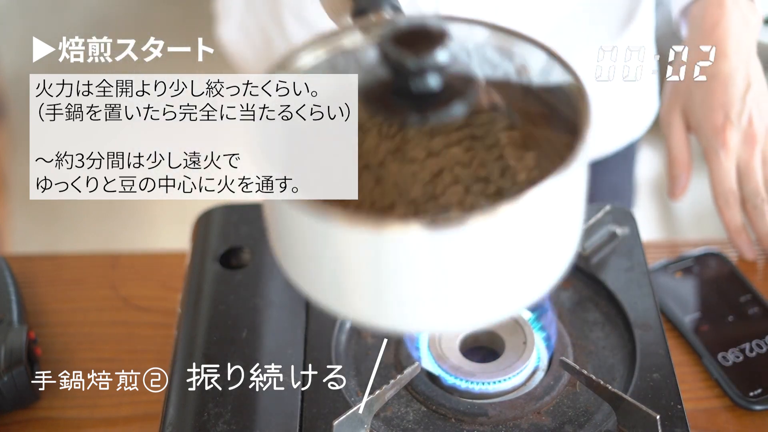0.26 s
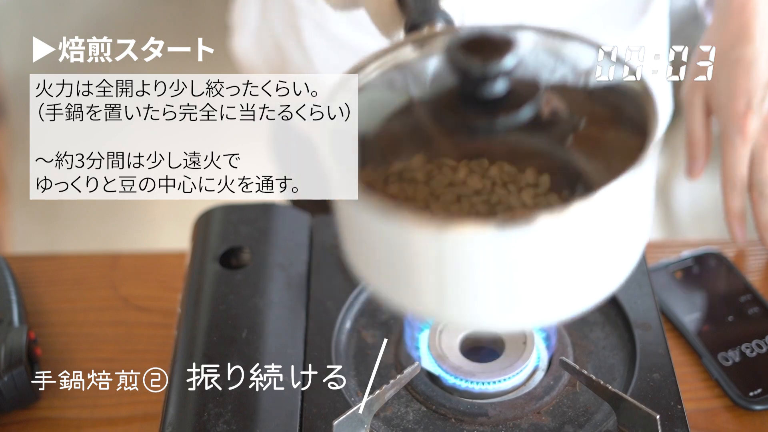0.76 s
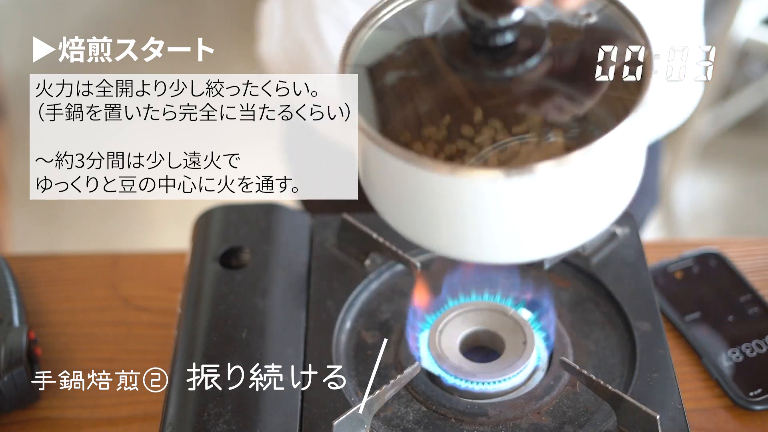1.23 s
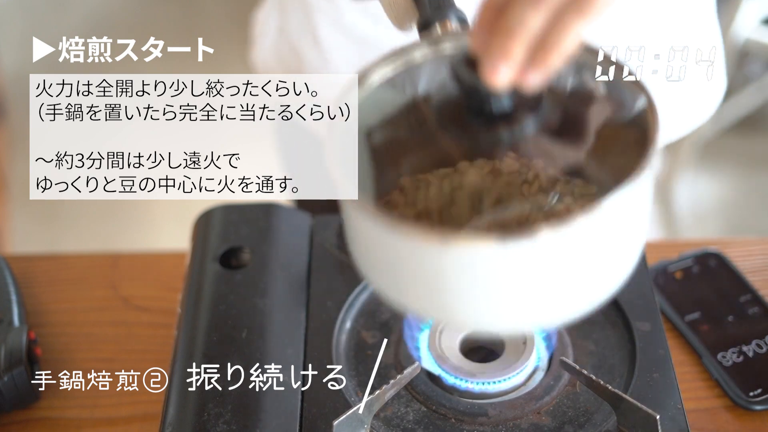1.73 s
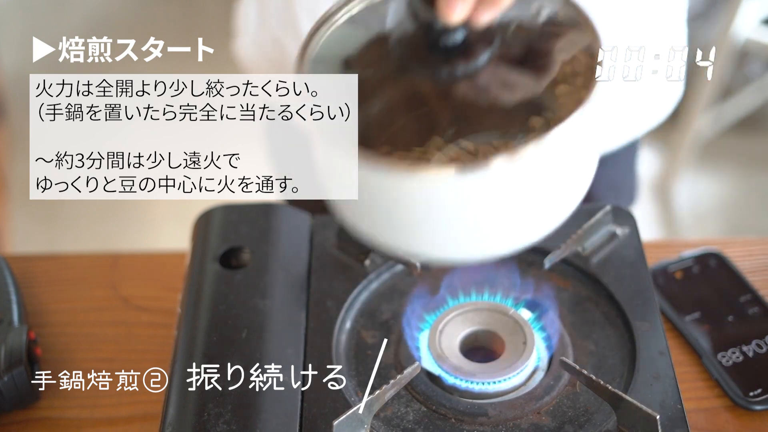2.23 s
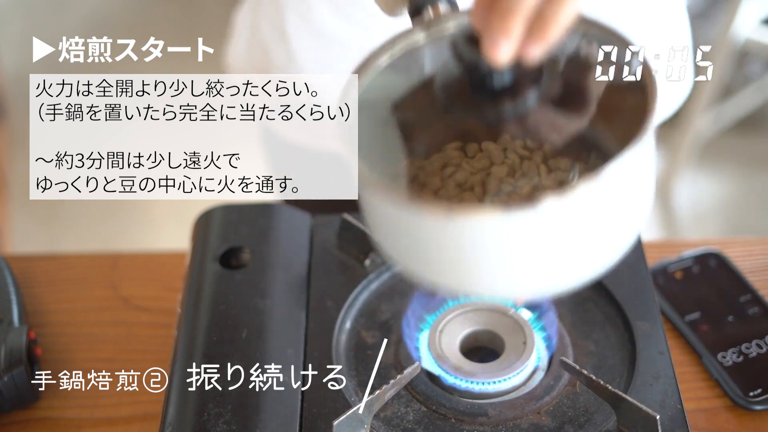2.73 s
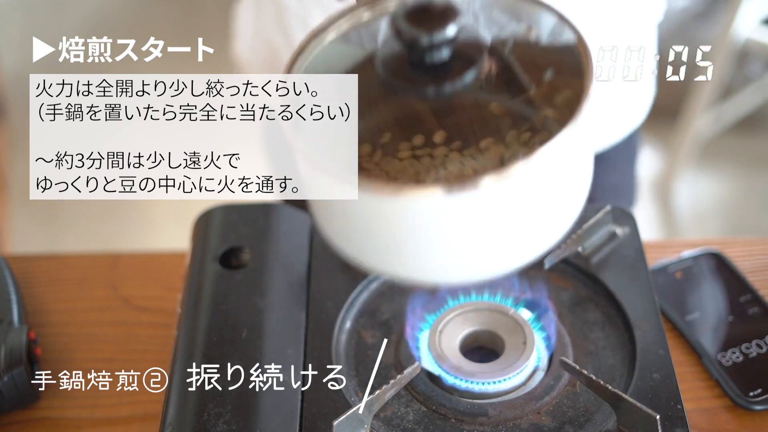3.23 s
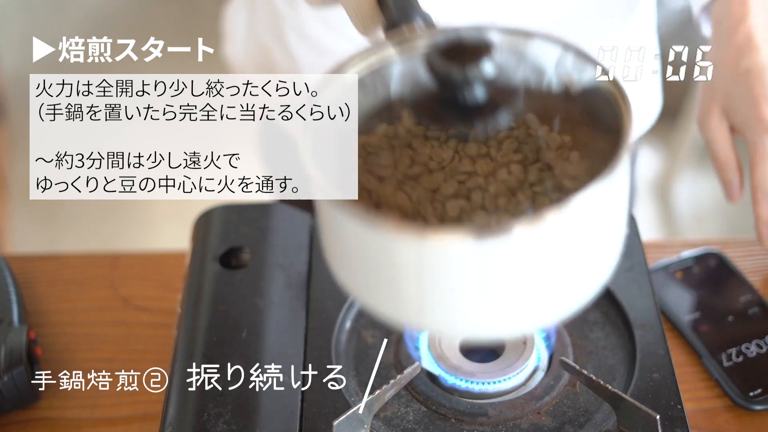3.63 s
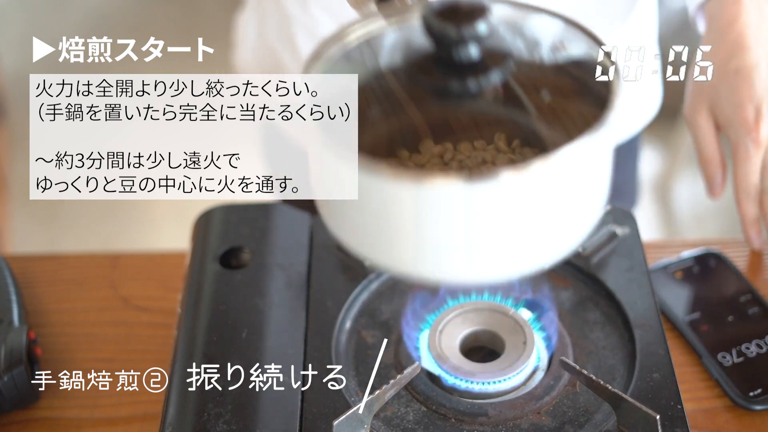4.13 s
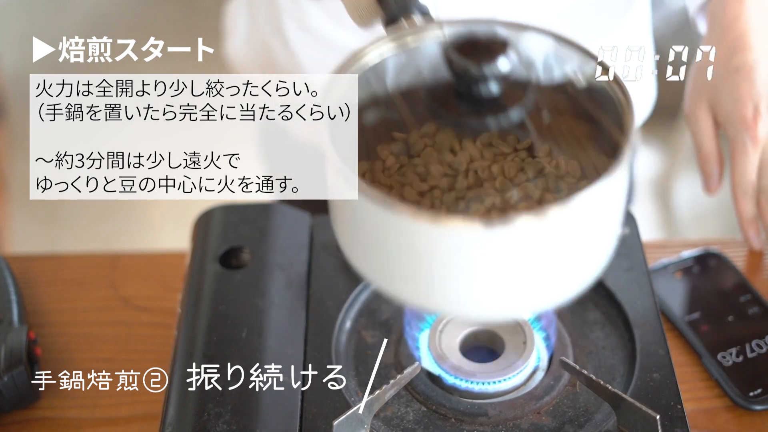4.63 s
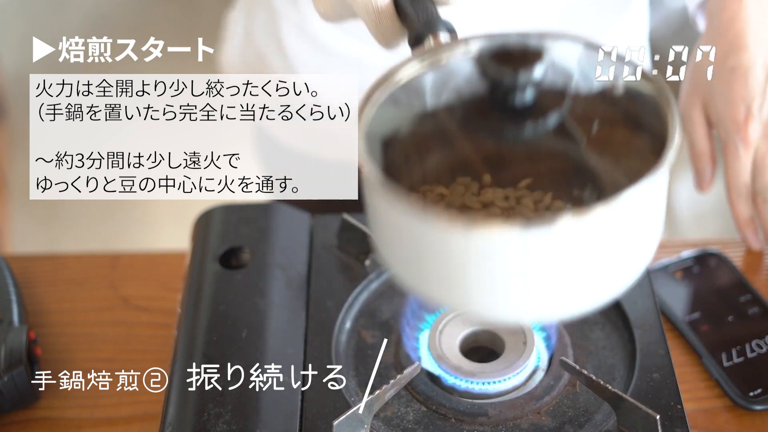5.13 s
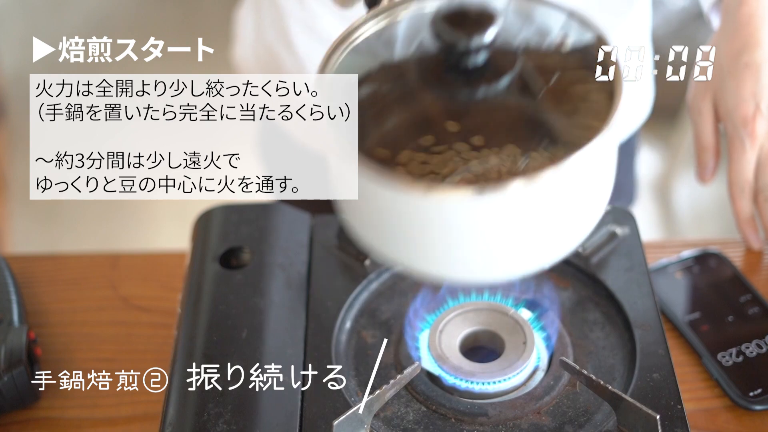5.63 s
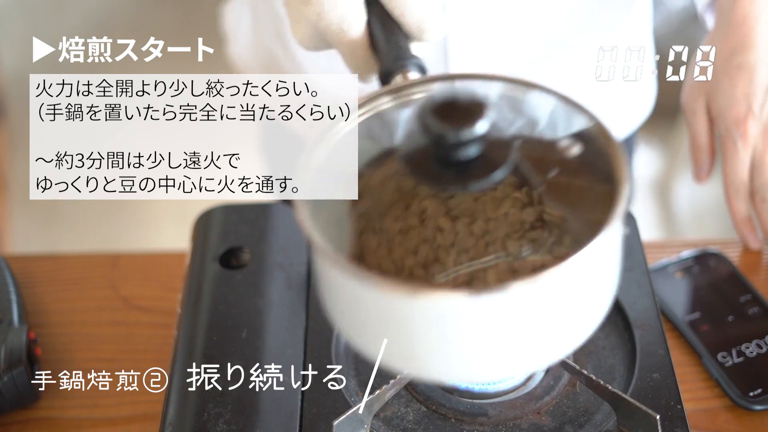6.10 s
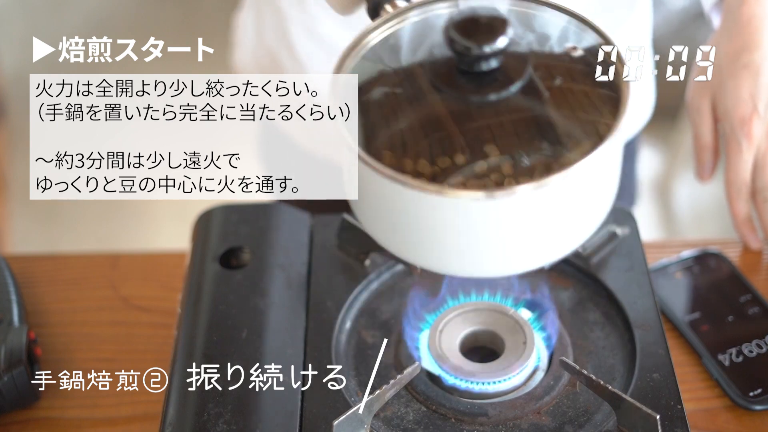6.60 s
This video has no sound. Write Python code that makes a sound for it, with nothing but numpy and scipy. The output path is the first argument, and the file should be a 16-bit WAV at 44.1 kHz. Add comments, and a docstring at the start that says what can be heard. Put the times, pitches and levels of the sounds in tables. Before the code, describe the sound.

A close microphone hears a pot of raw coffee beans shaken steadily over a gas burner. Grainy metallic rolling surges and briefly stops with each swing, joined by crisp patter on glass, strongest in the opening seconds. Sharp lid clinks and hollow knocks from the landing beans punctuate it throughout. The flame is barely audible, the bass is thin, and the small kitchen adds short, muted reflections.

```python
"""Raw beans tumble in a lidded metal pot shaken to and fro over a gas flame in a kitchen.
From the start, rolling beans tick on the metal and set it ringing, and flung beans patter on the glass lid.
The flame rushes softly as filtered noise, and the kitchen answers the pot with short, dull echoes.
Soon the loose lid starts to chatter on the rim: short bursts of touches ring pot and glass.
Then the heap begins to thud into the wall: ragged bursts of blows give a boom, a knock and a clack."""
import sys
import numpy as np
from scipy import signal
from scipy.fft import rfft, irfft, next_fast_len
from scipy.io import wavfile
from scipy.ndimage import map_coordinates

SR = 44100
rng = np.random.default_rng(int(sys.argv[2]) if len(sys.argv) > 2 else 0)


def invert_db(x):
    """Field ratio 10**(x/20) for x, a level in decibels (scalar or array-like)."""
    u = np.asarray(x, float) / 20
    return 10 ** u


def pcm_store(signal):
    """Save signal as 16-bit PCM."""
    levels = np.round(np.clip(np.atleast_2d(signal), -1, 1) * 32767)
    wavfile.write(sys.argv[1], SR, levels.astype(np.int16).T)


N = 302526  # samples, about 6.86 s

# where the beans roll, as a boost of some pot modes: t/s, low floor modes/dB, high wall modes/dB
ROLLING_PATH = [(0, 7, 2), (.4, 9.5, 8), (.8, 9, 3.5), (1.2, 5.5, 1), (1.6, 5.5, -1.5), (2.1, 8, 4.5),
                (2.6, 3, 2.5), (3.1, 8, 8.5), (3.6, 6.5, -1), (4.1, 5.5, 1.5), (4.6, 7, 1.5), (5.1, 3, 4.5),
                (5.6, 4.5, 6.5), (6.2, 4, 5), (6.86, 2.5, 1)]
# vigour of the shaking, before waves and lulls: t/s, rolling level/dB, thin spray level/dB
SHAKING_VIGOUR = [(0, -18.5, -23.5), (.45, -21.5, -27), (.85, -16, -20.5), (1.2, -15, -34),
                  (1.5, -23, -33.5), (1.85, -20.5, -29.5), (2.3, -21.5, -30.5), (2.8, -24, -31),
                  (3.3, -24, -30.5), (3.8, -17.5, -28), (4.2, -22, -37), (4.7, -25, -37.5),
                  (5.15, -21, -30.5), (5.5, -24.5, -26.5), (5.9, -22.5, -27), (6.4, -23, -31),
                  (6.86, -19, -28)]
# the heap lies still for a moment against the wall: t/s, depth/dB, half length/ms (to 1/e of the depth)
STILL_MOMENTS = [(.15, 3, 58), (.96, 5, 140), (1.308, 7, 18), (1.616, 12, 6.9), (1.948, 8, 50),
                 (2.6, 4, 36), (2.921, 12, 10), (3.252, 7, 25), (3.61, 7, 14), (3.95, 8.5, 23),
                 (4.31, 6, 24), (4.65, 5, 10), (4.959, 11, 16), (5.31, 7.5, 46), (5.66, 4.5, 30),
                 (6.69, 3, 61)]
# a wave of beans surges up to the lid: crest t/s, spray level/dB, lift of the rolling/dB, fall/ms (to 1/e)
BEAN_WAVES = [(.25, -49, 0, 72), (.86, -19, 5.5, 42), (1.03, -8.5, 4, 44), (1.181, -15.5, -8, 27),
              (1.391, -20, 2, 38), (1.85, -38, -1.5, 9), (2.01, -10.5, 5, 22), (2.16, -20, 2, 12),
              (2.329, -17.5, 5.5, 42), (2.46, -24, 0, 35), (2.645, -14.5, 7.5, 28), (2.81, -22, 5, 12),
              (2.966, -17.5, 5, 67), (3.32, -16, 5.5, 42), (3.7, -29, 0.5, 20), (3.9, -30, 0, 44),
              (4.03, -15.5, 7, 30), (4.35, -24.5, 4.5, 48), (4.53, -26.5, 0.5, 31), (4.72, -23.5, 7, 31),
              (5.37, -45, 1.5, 46), (5.86, -34, 0, 26), (6.06, -26.5, -2, 87), (6.4, -21.5, 0, 60),
              (6.74, -18, -3.5, 35)]
# modes (ringing pitches) of pot and lid: f/Hz
MODE_HZ = [590, 786, 1150, 1445, 2420, 2740, 3280, 3490, 3768, 4270, 4757, 5062, 5406, 6044, 6450, 6640,
           6795, 7120, 7550, 7950, 8755, 9520, 9995, 10450, 11060, 11900, 12250, 12915, 13300, 14080, 14480]
# how each of those modes rings: width/Hz (wider dies sooner), level/dB
MODE_RING = [(84, -12.5), (76, -2.5), (97, -16.5), (68.5, -5), (96, -13), (65, -6.5), (70, -11), (60, -7),
             (77.6, 4), (90.5, -12), (50, -6.5), (66, 1.5), (41, -8), (39.7, -8), (80, -7.5), (60, -9.5),
             (90, -3), (80, -11.5), (90, -14.5), (45, -14), (91, -10.5), (60, -15.5), (90, -9.5),
             (387, -11.5), (80, -7.5), (89, -14), (200, -14.5), (68, -8), (119, -15), (110, -19),
             (150, -12.5)]
# dry tick of one bean, its relative spectrum: f/Hz, level/dB
BEAN_TICK = [(100, -2), (250, -2.5), (400, -5.5), (800, -18), (1640, -2.5), (3090, -0.5), (4430, -10.5),
             (5800, -20.5), (7500, -18), (9200, -22), (10800, -19), (13500, -36.5), (15800, -15)]
# modes of the air and floor of the pot: f/Hz, width/Hz, level/dB
POT_HOLLOW = [(179.6, 59, -1), (254.8, 31.5, 4.5), (325, 12.3, -7.5), (475, 17, -8), (566, 280, -19)]
# band of the flame's rush, lower and upper edge: f/Hz
FLAME_BAND = [130, 700]
# the lid strikes the rim: t/s, relative peak level/dB, pitch the pot ring is centred on f/Hz,
# glass level against that peak/dB
LID_STRIKES = [(0.053, -3, 6790, 3), (0.389, -0.5, 6050, -1), (0.569, -5, 4250, -1), (0.815, 2, 4750, -4),
               (0.939, 1, 4140, -24), (0.953, 3, 4270, -20), (0.999, 5.5, 5250, -1), (1.118, -1, 3280, -22),
               (1.2595, -7, 4750, -18), (1.391, -2, 7100, 8), (1.8472, -12, 3750, 16.5),
               (1.8835, 4, 3960, -22), (1.892, 9, 4040, -13), (1.902, -1, 3860, -26), (2, -1, 7140, -7),
               (2.2096, -2, 3780, -25), (2.2272, 10.5, 4440, -23), (2.2988, 7, 4120, -9),
               (2.4654, 5, 6700, 0.5), (2.5535, 5, 3920, -30), (2.63, 0, 3770, -10),
               (2.8767, 1.5, 3770, -26), (2.9366, -2, 4000, -20), (2.956, 7.5, 6600, -4),
               (3.277, -14, 3900, 18), (3.301, -2, 3520, -12), (3.399, -6, 3490, -28), (3.457, -3, 3700, 0),
               (3.484, 1.5, 6790, 1.5), (3.569, -10, 4270, -16), (3.6446, -2, 2740, -3),
               (3.689, -8, 3760, 7), (3.745, -3, 4270, -20), (3.869, 1.5, 6770, -1), (4.0156, -5, 3760, -4),
               (4.096, -10, 5060, -4), (4.141, -12, 6790, -6), (4.187, -17, 6790, 5),
               (4.2175, 10, 7000, -8), (4.2424, -12, 3750, 7), (4.5167, 8, 7200, -1), (4.71, 3, 3770, -21),
               (4.7262, -7, 5040, 9.5), (5.2764, -0.5, 3920, -37), (5.6206, 6, 4030, -33),
               (5.9753, -3, 3880, -25), (5.9983, -1, 4040, -23), (6.042, -2, 6800, 1), (6.3, 3, 4200, -45),
               (6.312, 6, 4000, -30), (6.347, -3, 4270, -6), (6.3812, -2.5, 6500, 1.5),
               (6.5447, 4.5, 6180, -4), (6.6558, 3, 3840, -8), (6.7367, 2, 6850, -2)]
# the heap lands on the wall: t/s, relative peak level/dB, knock level against that peak/dB,
# landing time/ms (the blows die to 1/e), boom f/Hz
HEAP_LANDINGS = [(0.149, -10.5, -16, 9.5, 190), (0.35, -9, -8, 5.5, 235), (0.494, -19, -15, 20, 222),
                 (0.562, -6, -5, 6.4, 230), (0.743, -6, -11, 9.7, 183), (0.87, -22, -1, 29, 250),
                 (0.947, -4.5, 0.5, 23, 200), (1.1, -6.5, -1, 17.6, 192), (1.257, -5.5, -6.5, 11.8, 211),
                 (1.471, -9, -0.5, 13, 256), (1.576, -8, -2.5, 8, 253), (1.767, -8.5, -11, 7.4, 247),
                 (1.901, -7.5, -10, 13, 240), (2.107, -13, -11, 8.1, 222), (2.244, -9, -3.5, 12, 220),
                 (2.442, -14.5, -21, 8.7, 228), (2.564, -5.5, -6, 17.4, 264), (2.749, -14, -26, 12, 230),
                 (2.883, -10, -2, 19.5, 250), (3.042, -6, -4, 8.7, 274), (3.217, -10.5, -3, 19, 264),
                 (3.397, -4.5, -6.5, 8.5, 255), (3.566, -9, -3.5, 16.6, 282), (3.74, -4, -9, 6.7, 191),
                 (3.91, -5.5, -7, 29, 238), (4.088, -3.5, -7.5, 7.4, 272), (4.263, -12.5, -7.5, 12, 252),
                 (4.433, -4.5, -18, 9.4, 300), (4.592, -6.5, -15, 14, 295), (4.763, -7, -1.5, 9.8, 292),
                 (4.917, -9, -0.5, 8.8, 250), (5.099, -7.5, -7.5, 17, 249), (5.208, -17, -10, 7, 263),
                 (5.269, -8.5, 0.5, 7.1, 244), (5.458, -13, -11, 19, 232), (5.627, -17, 4, 11, 240),
                 (5.802, -15.5, -5, 31, 236), (5.97, -11.5, -3, 14.6, 250), (6.141, -11, -28, 6.8, 222),
                 (6.267, -17.5, -5, 9.7, 219), (6.309, -12.5, 1, 10.5, 188), (6.488, -9, -19, 12.7, 210),
                 (6.654, -7.5, 1.5, 10.5, 236), (6.84, -9, -15, 8.3, 210)]

SPRAY_LULL = 1.3  # in a lull the spray sinks this many times deeper than the rolling
WAVE_RISE_MS = 28.4  # a wave grows from 1/e to full in this time
SWING_HZ, SWING_M = 2.93, 0.079  # swing towards and away from the listener, metres to either side
FLAME_DB = -50.5  # level around which the flame flutters
KITCHEN_T60_S = 0.25  # time to fade by 60 dB at the lowest pitches; higher ones fade sooner
WALL_CUT_HZ = 3550  # each round of echo is duller above this
KITCHEN_DB = -15  # gain on the echoes
# the boom builds up slowly, so knock and clack start this much later to sound together with it
KNOCK_DELAY_S = 0.002
THUD_WIDTH_HZ = 95  # least mode width while the heap presses on the wall and damps the hollow


def in_time(rows):
    """Draws straight lines between the rows, giving each column a value at every sample."""
    s, *columns = np.transpose(rows)
    return [np.interp(np.arange(N) / SR, s, c) for c in columns]


def rms_one(x):
    """Scales a sound to an rms (average strength) of 1."""
    return x / np.sqrt(np.mean(x ** 2) + 1e-20)


def cut(x, hz, kind, order=2):
    """Keeps the low, high or middle pitches with a Butterworth filter."""
    sections = signal.butter(order, np.clip(hz, 10, 0.45 * SR), kind, fs=SR, output="sos")
    return signal.sosfilt(sections, x + 1e-18)


def drift(rate_hz):
    """Slow random wandering with spread 1: smoothed noise made at every 40th sample."""
    r = np.exp(-80 * np.pi * rate_hz / SR)
    noise = rng.standard_normal(N // 40 + 2002)
    slow = signal.lfilter([1], [1, -2 * r, r * r], noise)[2000:]  # skip the settling time
    return np.interp(np.arange(N) / 40, np.arange(len(slow)), rms_one(slow))


def resonate(x, hz, width_hz):
    """Rings one mode like a struck bell, with gain 1 at its own pitch."""
    r = np.exp(-np.pi * max(width_hz, 5) / SR)
    feedback = [1, -2 * r * np.cos(2 * np.pi * hz / SR), r * r]
    return signal.lfilter([(1 - r * r) / 2, 0, (r * r - 1) / 2], feedback, x + 1e-18)


def colour(x, spectrum):
    """Shapes a sound with third-octave bands of alternating sign, weighted by a spectrum."""
    edges = 25 * 2 ** np.arange(0, 9.6, 1 / 3)
    hz, db = np.transpose(spectrum)
    gains = invert_db(np.interp(np.log(edges * 2 ** (1 / 6)), np.log(hz), db))
    out = np.zeros(len(x))
    for k, (gain, low, high) in enumerate(zip(gains, edges, edges[1:])):
        out += gain * (-1) ** k * cut(x, [low, high], "band", order=1)
    return out


def contacts(per_s, spread_db, clump_db):
    """Random bean touches of uneven size that come in clumps, scaled to rms 1."""
    sizes = invert_db(spread_db * np.minimum(rng.exponential(1, N), 4.2))
    chance = per_s * invert_db(clump_db * drift(25)) / SR
    return rms_one(sizes * (rng.random(N) < chance))


def pot(clicks, wander_db, dry_db, lean_db=lambda hz: 0, lowest=0):
    """Every touch lands elsewhere, so each mode is struck with its own strength; a dry tick joins in."""
    out = invert_db(dry_db) * colour(clicks * rng.standard_normal(N), BEAN_TICK)
    for hz, (width_hz, db) in zip(MODE_HZ, MODE_RING):
        if hz > lowest:
            gain = invert_db(db + lean_db(hz) + wander_db * drift(8.7))
            out += gain * resonate(clicks * rng.standard_normal(N), hz, width_hz)
    return out


def swell(s, rise_ms, fall_ms):
    """A rounded rise to 1 at time s and an exponential fall, at every 64th sample."""
    ms = (np.arange(0, N + 64, 64) / SR - s) * 1000
    rise = np.exp(-(np.minimum(ms, 0) / rise_ms) ** 2)
    fall = np.exp(-np.maximum(ms, 0) / fall_ms)
    return np.where(ms < 0, rise, fall)


def shaking():
    """Levels of rolling and spray in dB: slow vigour, changed by each wave, sunk by each lull."""
    roll_db, spray_db = in_time(SHAKING_VIGOUR)
    t = np.arange(0, N + 64, 64) / SR
    lull_db, lift_db, surge = np.zeros((3, len(t)))
    for s, depth_db, half_ms in STILL_MOMENTS:
        lull_db += depth_db * np.exp(-((t - s) * 1000 / half_ms) ** 2)
    for s, db, wave_lift_db, fall_ms in BEAN_WAVES:
        wave = swell(s, WAVE_RISE_MS, fall_ms)
        lift_db += wave_lift_db * wave
        surge += invert_db(db) * wave
    lull_db, lift_db, surge = [np.interp(np.arange(N) / SR, t, v) for v in (lull_db, lift_db, surge)]
    spray_db = 20 * np.log10(invert_db(spray_db) + surge)
    return roll_db + lift_db - lull_db, spray_db - SPRAY_LULL * lull_db


def avalanche(per_s, rise_s, fall_s, first):
    """Uneven touches that swell and die within 1/12 s, led by one touch of a set size."""
    t = np.arange(SR // 12) / SR
    touches = (rng.random(len(t)) < per_s / SR) * rng.standard_normal(len(t))
    touches *= (1 - np.exp(-t / rise_s)) * np.exp(-(t / fall_s) ** 2)
    touches[0] = first
    return touches


def add(out, s, sound, peak_db):
    """Lays a sound into out at time s with the given peak."""
    at = max(int(s * SR), 0)
    out[at:at + len(sound)] += invert_db(peak_db) * sound / np.abs(sound).max()


def rolling():
    """Beans rolling over the floor and up the wall ring the metal and also stir the pot's hollow."""
    roll_db, _ = shaking()
    floor_db, wall_db = in_time(ROLLING_PATH)

    def lean_db(hz):
        """Boosts the floor or wall modes as the beans roll there."""
        if 2000 < hz < 3000:
            return floor_db
        return wall_db if hz > 5300 else 0

    clicks = contacts(2000, spread_db=2.2, clump_db=2.0)
    metal = pot(clicks, wander_db=3.0, dry_db=-9.0, lean_db=lean_db)
    metal = rms_one(cut(metal, 6960, "low"))
    hollow = np.zeros(N)
    for hz, width_hz, db in POT_HOLLOW:
        hollow += invert_db(db) * resonate(clicks * rng.standard_normal(N), hz, width_hz)
    hollow = rms_one(cut(hollow, 160, "high"))
    return invert_db(roll_db + 0.5) * (metal + invert_db(-19.0) * hollow)


def spray():
    """Beans flung against the glass touch harder and shorter: only the high modes speak."""
    _, spray_db = shaking()
    clicks = contacts(1500, spread_db=2.0, clump_db=3.5)
    high = cut(pot(clicks, wander_db=4.0, dry_db=6, lowest=4500), 6200, "high", order=3)
    return invert_db(spray_db + 1.0) * rms_one(high)


def swung(x):
    """As the pot swings, its changing distance bends the pitch slightly up and down."""
    seconds = np.arange(N) / SR
    lag = SWING_M / 343 * SR * np.sin(2 * np.pi * SWING_HZ * seconds)  # sound travels 343 m/s
    return map_coordinates(x, [np.arange(N) - lag], order=3, mode="nearest")


def flame():
    """The gas flame is a soft rush: a band of noise with a slowly fluttering level."""
    rush = rms_one(cut(rng.standard_normal(N), FLAME_BAND, "band"))
    return invert_db(FLAME_DB + 2.5 * drift(2.2)) * rush


def kitchen(x):
    """Room echoes from eight feedback delays, weaker and duller on every round."""
    size = next_fast_len(N + SR)
    w = 2 * np.pi * np.arange(size // 2 + 1) / size  # radians per sample
    dull = 1 / (1 + 1j * w * SR / (2 * np.pi * WALL_CUT_HZ))
    echoes = 0
    for k, lag in enumerate(rng.uniform(0.0088, 0.03, 8) * SR):
        one_round = invert_db(-60 * lag / SR / KITCHEN_T60_S) * dull * np.exp(-1j * w * lag)
        echoes = echoes + (-1) ** k * one_round / (1 - one_round)
    return irfft(rfft(x, size) * echoes, size)[:N]


def lid():
    """A sharp touch and quick rebounds on the rim: pot modes near one pitch ring, the glass tinkles above."""
    out = np.zeros(N + SR)
    for s, peak_db, centre_hz, glass_db in LID_STRIKES:
        touches = avalanche(1500, 0.0003, 0.008, first=3.0)
        metal = invert_db(1.5) * cut(touches, [0.8 * centre_hz, 1.5 * centre_hz], "band")
        glass = invert_db(-22) * cut(touches, 9700, "high")
        for hz, (width_hz, db) in zip(MODE_HZ, MODE_RING):
            uneven = touches * rng.uniform(0.17, 12.6, len(touches))
            ring = resonate(uneven, hz, 0.79 * width_hz)  # narrower, so it rings longer
            octaves_off = abs(np.log2(hz / centre_hz))
            metal += invert_db(0.19 * db - 70 * octaves_off + 15) * ring
            if hz > 8000:
                glass += invert_db(db + 27 + 1.6 * rng.standard_normal()) * ring
        add(out, s, metal, peak_db - 7.5)
        add(out, s, glass, peak_db + glass_db - 3.0)
    return out[:N]


def thuds():
    """The heap lands as a ragged avalanche of blows: a boom in the hollow, a knock and a clack of metal."""
    out = np.zeros(N + SR)
    for s, peak_db, knock_db, ms, boom_hz in HEAP_LANDINGS:
        blows = avalanche(1400, 0.0015, ms / 1000, first=0.38)
        boom = invert_db(-11.5) * cut(blows, [0.45 * boom_hz, 2.61 * boom_hz], "band")
        for k, (hz, width_hz, db) in enumerate(POT_HOLLOW):
            near_db = -9 * abs(np.log2(hz / boom_hz))  # modes near the boom pitch are favoured
            gain = invert_db(0.7 * db + near_db + 1.5 * rng.standard_normal())
            boom += gain * (-1) ** k * resonate(blows, hz, max(width_hz, THUD_WIDTH_HZ))
        add(out, s, boom, peak_db + 0.5)

        knock = cut(blows * rng.standard_normal(len(blows)), [400, 1300], "band")
        knock += invert_db(3.0) * resonate(blows, MODE_HZ[1], 250)
        add(out, s + KNOCK_DELAY_S, knock, peak_db + knock_db + 4.5)

        patter = avalanche(2500, 0.0005, 1.1 * ms / 1000, first=1.2)
        clack = cut(patter, [1500, 5200], "band", order=3)
        add(out, s + KNOCK_DELAY_S, clack, peak_db + 0.4 * knock_db + 2.5)
    return out[:N]


def scene():
    """The pot with its echoes in the kitchen, and the flame below; one channel."""
    shaken = swung(rolling() + spray()) + lid() + thuds()
    echoes = invert_db(KITCHEN_DB) * kitchen(cut(shaken, 310, "high"))
    return (shaken + echoes + flame())[None]


def roll_off(x):
    """The treble ends steeply here."""
    return signal.sosfilt(signal.butter(12, 16460, fs=SR, output="sos"), x)


def record(dry):
    """The microphone rounds the peaks and drops the deep bass; the top is cut."""
    rounded = 1.238 * np.tanh(dry / 1.25)
    no_bass = cut(rounded, 174, "high")
    top = signal.ellip(10, 0.5, 60, 15900, fs=SR, output="sos")
    mix = signal.sosfilt(top, no_bass)
    return roll_off(mix)


dry = scene()
out = record(dry)
pcm_store(out)
```